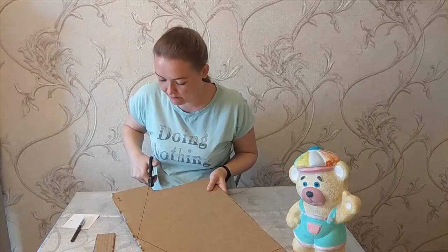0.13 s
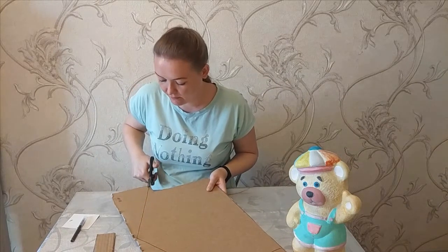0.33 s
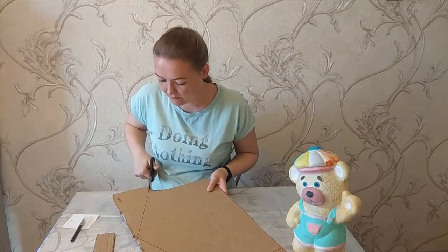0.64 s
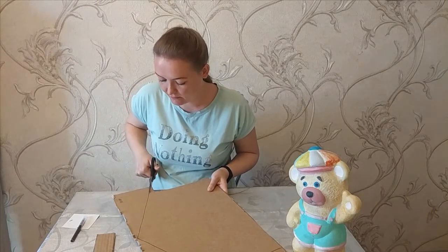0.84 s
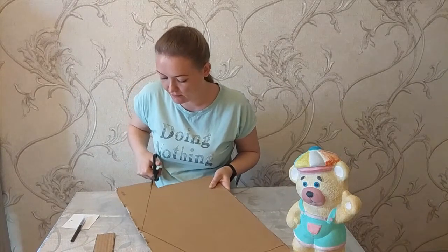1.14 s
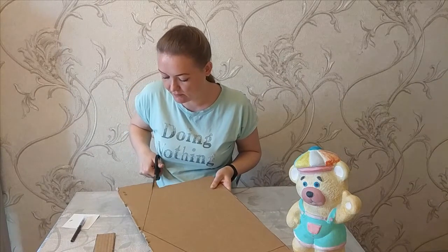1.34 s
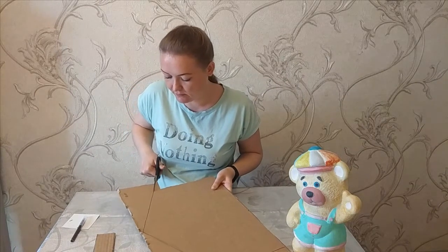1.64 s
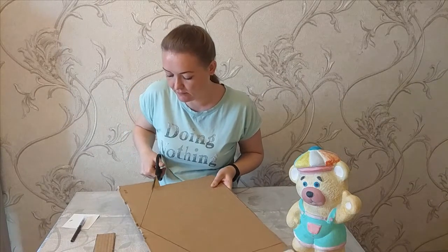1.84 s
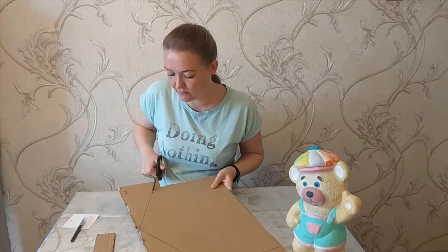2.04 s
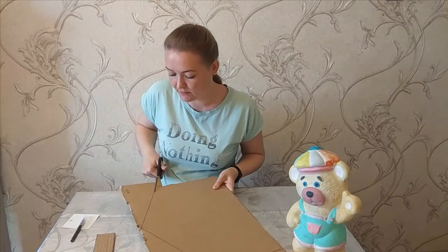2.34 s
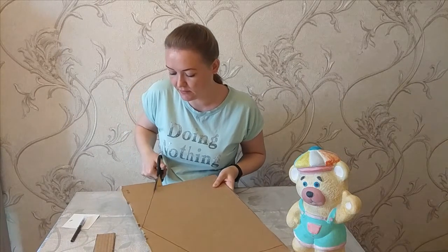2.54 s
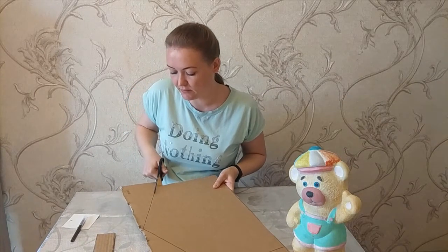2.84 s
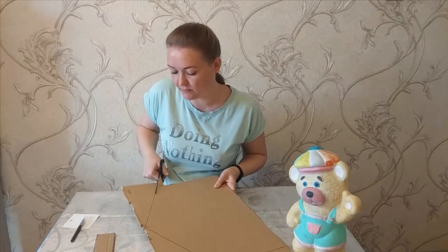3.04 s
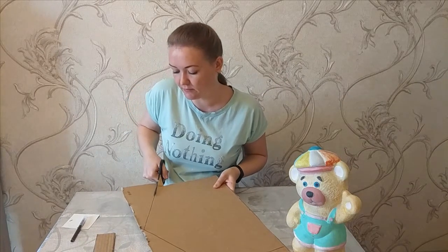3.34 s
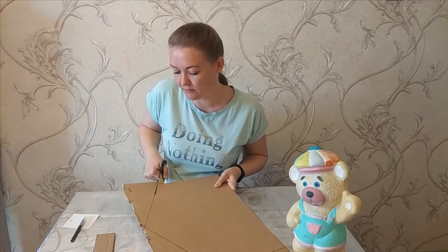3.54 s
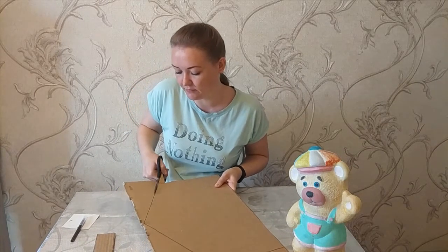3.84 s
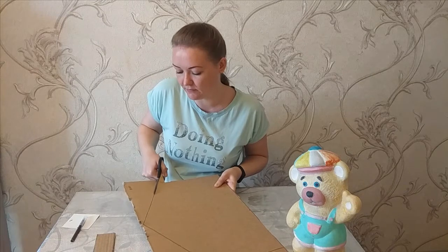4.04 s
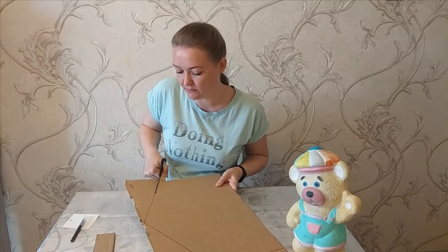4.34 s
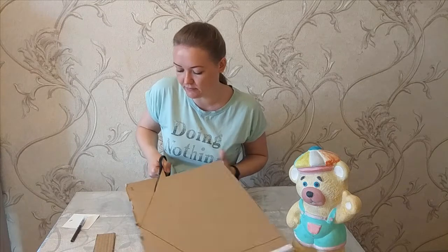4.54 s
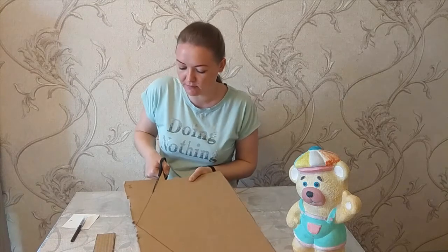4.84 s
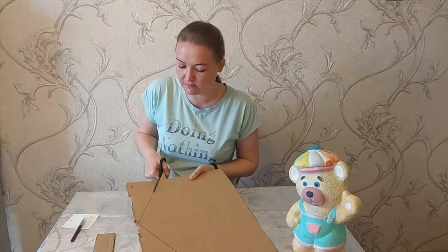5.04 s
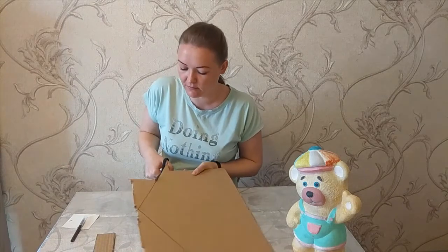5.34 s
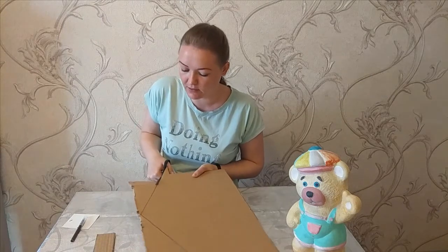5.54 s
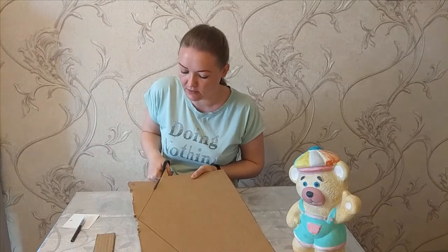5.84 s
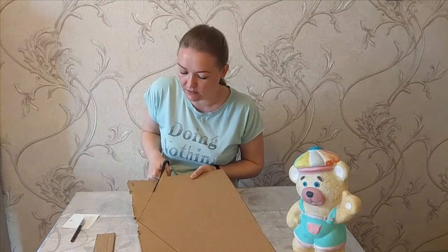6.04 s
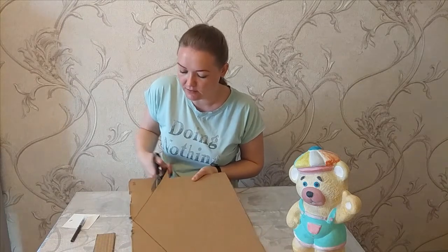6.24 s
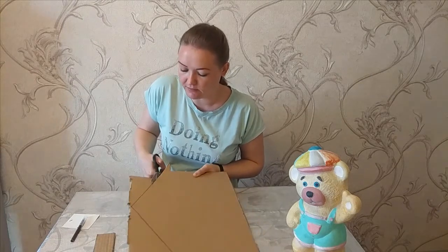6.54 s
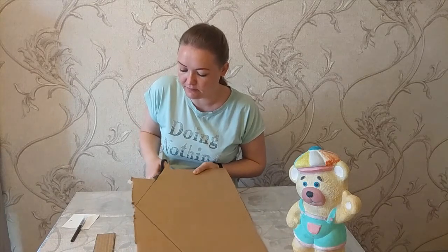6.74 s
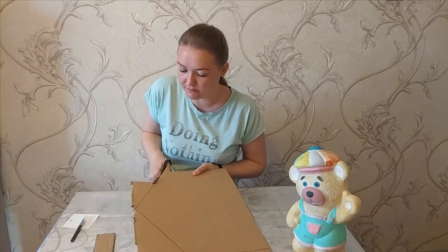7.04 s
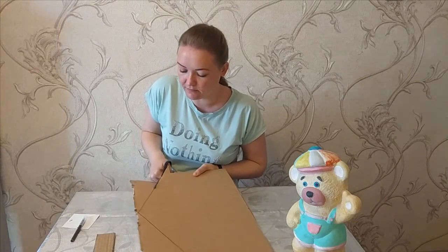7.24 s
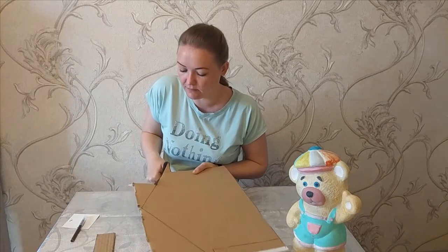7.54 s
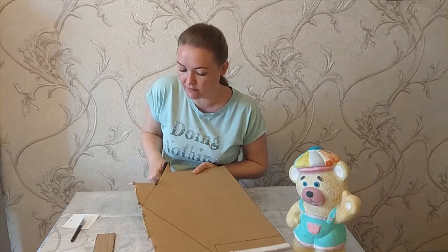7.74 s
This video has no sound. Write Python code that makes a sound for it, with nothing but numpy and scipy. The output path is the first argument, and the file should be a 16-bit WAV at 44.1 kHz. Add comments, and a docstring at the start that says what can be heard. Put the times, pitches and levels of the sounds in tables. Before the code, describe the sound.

In a small, quiet room, someone works scissors through a stiff cardboard sheet, heard from a couple of metres away. The cutting starts softly, then goes on as irregular crunches, crisp tearing and hollow cracks as the cardboard gives way. Between and under the cuts come light flaps of the sheet, a few dull bumps and a faint hum from the table. A low rumble lies underneath.

```python
"""A small room, a table two metres away: scissors bite through thick cardboard.
Each stroke tears fibres in dense crackles. Flutes give way in snaps that ring the hollow sheet.
The sheet flaps and nudges the table into a hum; now and then an arm bumps the table.
Low rumble and quiet air lie underneath."""
import sys
import numpy as np
from scipy import signal
from scipy.fft import rfft, irfft, next_fast_len
from scipy.io import wavfile
from scipy.ndimage import uniform_filter1d, map_coordinates

SR = 44100
rng = np.random.default_rng(int(sys.argv[2]) if len(sys.argv) > 2 else 0)


def to_wav(s):
    """Save 16-bit WAV."""
    ch = np.atleast_2d(s).T  # columns
    pcm = np.round(np.clip(ch, -1, 1) * 32767)  # PCM
    wavfile.write(sys.argv[1], SR, pcm.astype(np.int16))


N = 347508

# (full force at [s], rise [s], hold [s], tear [dB], ring, crunch, panel, flap [dB re tear])
BLADE_STROKES = [(-0.005, 0.078, 0.056, -60.5, -16, -22, -28, -15),
                 (0.324, 0.07, 0.23, -59, -13.5, -15.5, -20, -9),
                 (0.648, 0.18, .04, -52, -8.5, -14, -14, -11),
                 (0.736, 0.064, 0.072, -43, -17, -19, -24, -44),
                 (0.853, 0.022, 0.0082, -40.5, -14, -14, -27, -26),
                 (1.024, 0.12, 0.05, -44, -20, -11, -42, -27), (1.1, .05, 0.038, -58.5, -5, 1, -16, -9),
                 (1.341, 0.016, 0.018, -53, -28, -38, -43, -19),
                 (1.416, 0.038, 0.13, -42, -16, -29, -20, -25),
                 (1.542, 0.081, 0.0086, -37, -10.5, -28, -21, -44),
                 (1.767, 0.065, 0.066, -41.5, -22, -13.5, -31, -35),
                 (1.966, 0.088, 0.057, -55, -23, -32, -32, -23), (1.87, .03, 0.023, -56, -1, 1.5, -12, -11),
                 (2.098, 0.069, 0.033, -44.5, -23, -23, -34, -22),
                 (2.153, 0.051, 0.059, -43.5, -3, -9.5, -21, -15),
                 (2.259, 0.17, 0.0081, -36, -3.5, -13, -14.5, -27),
                 (2.481, 0.14, 0.056, -43, -13.5, -10.5, -27, -25),
                 (2.746, 0.15, 0.066, -58.5, -5.5, -8, -7, -16),
                 (2.892, 0.036, 0.0067, -30, -2, -14, -13.5, -27),
                 (3.132, 0.065, 0.052, -43.5, -15, -10, -18.5, -33.5),
                 (3.364, .15, 0.052, -56, -0.5, -2, -26.5, -5),
                 (3.498, 0.044, 0.024, -33.5, -4, -7.5, -23, -18),
                 (3.569, 0.023, 0.0033, -24.5, -15, -17, -30.5, -29),
                 (3.805, 0.15, 0.0085, -40.5, -13, -10.5, -24, -22.5),
                 (4.079, 0.11, .01, -50, 4, 2, -7, -3), (4.195, 0.05, 0.086, -40, -7, -13, -13, -12),
                 (4.445, 0.15, 0.069, -43.5, -11.5, -15.5, -19, -20.5),
                 (4.598, 0.077, 0.037, -53.5, -29, -32, -21, -20),
                 (4.698, 0.19, 0.039, -48.5, -36, -33, -39, -17),
                 (4.797, 0.079, 0.088, -52, -12, -12, -10.5, -11),
                 (5.036, 0.17, 0.026, -47, -13.5, -11, -18, -17),
                 (5.156, 0.18, 0.022, -48, -10.5, -15, -9, -18),
                 (5.384, .2, 0.018, -60.5, -30, -32, -6.5, -23),
                 (5.584, 0.042, 0.0046, -33.5, -24, -21.5, -17, -19.5),
                 (5.759, 0.035, 0.025, -69, 11.5, 4, 6, -10),
                 (5.841, 0.091, 0.072, -47.5, -27, -17, -9, -20),
                 (5.976, 0.11, 0.018, -38, -9.5, -15.5, -11, -12),
                 (6.251, 0.11, 0.042, -39.5, -8, -11.5, -14, -20),
                 (6.317, 0.047, 0.052, -61.5, -17, 5.5, -15, -6),
                 (6.485, 0.21, 0.018, -45.5, -15, -16, -14.5, -22),
                 (6.615, 0.13, 0.12, -56.5, -17, -16, -17, -13.5),
                 (6.75, 0.026, 0.023, -62.5, -1, 1, 6, 2.5), (6.808, 0.15, .04, -65, -5, 2, 5, 5.5),
                 (7.002, 0.4, 0.061, -54.5, -8.5, -19, -8.5, -15),
                 (7.175, 0.17, 0.011, -41.5, -25, -18, -9, -20),
                 (7.268, 0.03, 0.0078, -34.5, -9, -18, -12.5, -18),
                 (7.433, 0.042, 0.019, -54, -8, -3, 3, -22), (7.503, 0.23, 0.03, -44.5, -29, -27, -33, -33),
                 (7.721, 0.13, .02, -54.5, -11, -13, -13, -19),
                 (7.864, 0.11, .03, -40, -10.5, -9.5, -12.5, -13.5)]
# decay after a stroke: (tear, scrape, ring, crunch, panel, flap [dB/s])
LAYER_FALL_DB_PER_S = [205, 150, 151, 140, 151, 130]
# hands resting on the sheet: (tear, scrape, ring, crunch, panel, flap [dB])
LAYER_REST_DB = [-67, -76, -79.5, -111, -78, -76.5]
# flutes giving way: (time [s], level [dB], ring, crunch [dB re level], t60 [s], pitch [Hz])
FLUTE_SNAPS = [(0.45, -42, -6.5, -30, 0.46, 664), (0.586, -34, -14, -25, 0.26, 673),
               (0.637, -26, -11, -15.5, 0.28, 505), (0.737, -26, -8.5, -34, 0.23, 685),
               (0.791, -27.5, -11, -23, 0.2, 686), (0.845, -17, -18, -30, 0.092, 650),
               (0.964, -47.5, -15, 10.5, 0.26, 945), (1.099, -33.5, -22, -2, 0.33, 1050),
               (1.151, -48.5, 9, 7, 0.088, 1130), (1.421, -19, -20, -30, 0.2, 686),
               (1.524, -18, -7.5, -12, 0.17, 640), (1.735, -29, -46, -25, 0.19, 1720),
               (1.81, -26, -25, -2.5, 0.23, 1170), (2.09, -19, -21, -39, 0.24, 715),
               (2.153, -33.5, 10.5, 2, 0.18, 750), (2.234, -15, 0.5, -4, 0.29, 734),
               (2.457, -25.5, -29, -12, 0.16, 1470), (2.735, -44, -1, -8, 0.13, 664),
               (2.868, -11, -10, -12.5, 0.2, 750), (3.106, -37, -20, -22, 0.23, 690),
               (3.159, -30, -38, 1, 0.18, 1190), (3.38, -46, 12, -20, 0.2, 760),
               (3.411, -36, 3.5, -24, 0.13, 690), (3.483, -8, -15.5, -17, 0.066, 730),
               (3.509, -17.5, -1, -23, 0.18, 700), (3.565, -9.5, -8.5, -8.5, 0.18, 990),
               (4.03, -42.5, 9, -29, 0.17, 686), (4.066, -35, -15, -0.5, 0.24, 1530),
               (4.19, -30.5, 7, -28, 0.61, 646), (4.37, -36.5, -26, -0.5, 0.2, 1430),
               (4.429, -48, -20, -39, 0.22, 890), (4.749, -27, -17, -28, 0.24, 770),
               (4.819, -44.5, 5, -23, 0.31, 646), (5.149, -39, -10, -8, 0.24, 576),
               (5.233, -38, -0.5, -2, 0.29, 1000), (5.542, -57, 19, -21, 0.31, 617),
               (5.569, -25, -3, -6, 0.17, 577), (5.759, -43.5, 1, -9, 0.2, 616),
               (5.868, -20, -10.5, -13, 0.23, 620), (5.942, -19.5, -7, -25, 0.17, 606),
               (5.986, -36, -16, -22, 0.7, 390), (6.284, -28, 2.5, -25, 0.18, 736),
               (6.823, -30, -10, -9, 0.29, 514), (7.13, -25, -4, -8, 0.38, 610),
               (7.265, -13, -19, -12, 0.24, 654), (7.435, -39, 2, -2.5, 0.28, 460),
               (7.81, -29.5, -10.5, -14, 0.14, 830), (7.851, -17, -6, -18, 0.21, 455)]
# spectra of the cut: (frequency [Hz], density [dB])
TEAR_SPECTRUM = [(4120, -20.5), (7000, -18.5), (7820, -15), (8180, -10), (9300, -3.5), (10900, 2),
                 (12300, 2), (15100, -9), (16000, -12.5)]
SCRAPE_SPECTRUM = [(1650, -4.5), (2800, -3.5), (4040, -3), (6430, -3), (7570, -3), (8500, -8.5),
                   (11000, -67), (18700, -120)]
CRUNCH_SPECTRUM = [(800, -51), (1050, 5.5), (2000, 8.5), (3000, -49), (3800, -58)]
# sheet near the cut, its wide free panel, flute walls: (frequency [Hz], width [Hz], level [dB])
SHEET_MODES = [(651.8, 18, 1.5), (701.4, 31.4, 3), (757, 31, -1.5), (832, 35, -0.5), (868.7, 34, 1),
               (965, 33, 0), (1002, 59, 2)]
PANEL_MODES = [(403.3, 22, 1), (472, 18.5, 0.5), (511.4, 37, -1.5), (574.4, 12, -2.5)]
FLUTE_MODES = [(1162, 156, -6), (1360, 200, -6.5), (1547, 67, -8.5), (1693, 250, -3), (1980, 74, -3),
               (2370, 240, -0.5), (2560, 1070, 2.5)]
# arm against table: (time [s], level [dB])
ARM_BUMPS = [(0.334, -42), (1.461, -18), (3.217, -26), (7.366, -30.5)]
# table resonances: (frequency [Hz], level [dB], t60 [s])
TABLE_MODES = [(69.7, 1, 0.3), (119.6, -17, 0.38)]
# sheet against table: (time [s], hum level [dB])
SHEET_NUDGES = [(0.85, -66.5), (1.27, -61), (1.75, -61), (2.24, -58.5), (2.6, -58), (2.9, -51),
                (3.5, -46.5), (3.68, -49.5), (4.1, -53.5), (4.3, -60.5), (4.5, -62), (4.76, -56.5),
                (5.9, -58.5), (6.0, -55.5), (6.3, -67), (6.7, -64), (7.31, -53), (7.86, -61)]
# low rumble: (time [s], level [dB])
RUMBLE_LEVELS = [(0.0, -58.5), (0.48, -58.5), (0.79, -48.5), (1.29, -62), (1.6, -51), (1.82, -56),
                 (4.94, -57.5), (5.27, -57.5), (7.02, -62), (7.88, -51)]
# room air: (frequency [Hz], density [dB])
AIR_SPECTRUM = [(29, -16), (50, 12.5), (184, -2), (345, -8), (380, -12), (1580, -11.5), (4560, -11),
                (5020, -17.5), (7570, -54), (12000, -32), (16000, -27)]
# left-right likeness: (frequency [Hz], coherence [0-1])
STEREO_COHERENCE = [(60, 0.91), (300, 0.94), (640, 0.73), (1400, 0.17), (4000, 0.06), (7000, 0.067),
                    (9000, 1), (15000, 0.96)]
# left behind right: (frequency [Hz], lag [cycles])
LEFT_LAG = [(200, 0.0088), (950, 0.072), (1700, 0.058), (4000, 0.56), (7000, 0.71), (8500, 0.86),
            (16000, 1)]


def scissors(tear_gain, scrape_gain, ring_gain, crunch_gain, panel_gain):
    """Steady tearing and snaps drive the same fibres and the same sheet."""
    treble_snap, ring_snap, crunch_snap = snap_gains()
    fibres = crackle(rate_hz=2500, spread_db=2.0, clump_db=3.0, wet=2.5, t60_s=0.53)
    flutes = crackle(rate_hz=450, spread_db=1.0, clump_db=2.5, wet=2.07, t60_s=0.2)
    out = np.hypot(tear_gain, treble_snap) * coloured(fibres, TEAR_SPECTRUM)
    out += np.hypot(scrape_gain, amp(-14) * treble_snap) * coloured(fibres, SCRAPE_SPECTRUM)
    walls = cardboard_ring(flutes, FLUTE_MODES, drift_db=2.5, drift_hz=9)
    crunch = unit(walls + 0.76 * coloured(flutes, CRUNCH_SPECTRUM))
    out += np.hypot(crunch_gain, crunch_snap) * crunch
    sheet = cardboard_ring(flutes, SHEET_MODES, drift_db=4.0, drift_hz=3.013)
    out += np.hypot(ring_gain, ring_snap) * sheet
    return out + panel_gain * cardboard_ring(flutes, PANEL_MODES, drift_db=3.0, drift_hz=4)


def stroke_gains(climb_db=34.5):
    """Gain per layer: each stroke rises, holds and dies; powers add."""
    at_s, rise_s, hold_s, tear_db, *offsets_db = np.transpose(BLADE_STROKES)[:, :, None]
    t = np.arange(0, N, 32) / SR
    scrape_db = -12.5 + 0.13 * (tear_db + 40)  # more force, more scrape
    peak_db = tear_db + np.array([np.zeros_like(at_s), scrape_db, *offsets_db])
    rise_db = climb_db * np.maximum(at_s - t, 0) / rise_s
    fall_db = np.reshape(LAYER_FALL_DB_PER_S, (-1, 1, 1)) * np.maximum(t - at_s - hold_s, 0)
    power = np.sum(amp(peak_db - fall_db - rise_db) ** 2, axis=1)
    return [np.interp(np.arange(N) / SR, t, np.sqrt(layer + amp(rest_db) ** 2))
            for layer, rest_db in zip(power, LAYER_REST_DB)]


def crackle(rate_hz, spread_db, clump_db, wet, t60_s):
    """Tiny uneven breaks in clumps; near walls answer each with a dying hiss."""
    size = amp(spread_db * np.minimum(rng.exponential(size=N), 3) + clump_db * wobble(70))
    breaks = size * rng.standard_normal(N) * (rng.random(N) < rate_hz / SR)
    local_power = np.abs(uniform_filter1d(breaks ** 2, size=SR // 16))
    breaks /= np.sqrt(local_power + 0.009 * np.mean(breaks ** 2))
    tail = amp(-60 * np.arange(SR // 4) / SR / t60_s) ** 2
    echo = np.sqrt(np.abs(signal.fftconvolve(breaks ** 2, tail / tail.sum())[:N]))
    return wet * echo * rng.standard_normal((2, N)) + [breaks, np.zeros(N)]


def snap_gains(trim_db=-18):
    """A flute gives way: a crack, then room decay. Rows: treble, ring, crunch."""
    gains, t = np.zeros((3, N + SR)), np.arange(SR // 2) / SR
    crack_t60_s = np.array([[.008], [.05], [.03]])
    crack = np.array([[.7], [.8], [1.8]]) * amp(-60 * t / crack_t60_s)
    for at_s, db, ring_db, crunch_db, t60_s, _ in FLUTE_SNAPS:
        shape = amp(-60 * t / t60_s) * (1 - np.exp(-t / 0.00066)) * (1 + crack)
        add_at(gains, at_s, amp(db + trim_db) * amp([[0], [ring_db], [crunch_db]]) * shape)
    return gains[:, :N]


def cardboard_ring(drive, modes, drift_db, drift_hz, falloff_db_per_oct=11.5):
    """Modes trade strength as grip and cut move; those near the snap pitch lead."""
    pitch_oct = timeline([(at_s, np.log2(hz)) for at_s, *_, hz in FLUTE_SNAPS])
    shares = []
    for hz, _, db in modes:
        distance_oct = np.abs(np.log2(hz) - pitch_oct)
        shares.append(amp(db + drift_db * wobble(drift_hz) - falloff_db_per_oct * distance_oct))
    shares = np.array(shares) / np.linalg.norm(shares, axis=0)
    return unit(sum(share * resonance(drive, hz, width_hz)
                    for share, (hz, width_hz, _) in zip(shares, modes)))


def sheet_knocks(trim_db=-13.5, falloff_db_per_oct=25.4):
    """Each snap strikes the sheet; modes near its pitch ring freely."""
    out, t = np.zeros(N + SR), np.arange(SR // 4) / SR
    hz, width_hz, mode_db = np.transpose(PANEL_MODES + SHEET_MODES + FLUTE_MODES)[:, :, None]
    attack = 1 - np.exp(-t / 0.0021)
    for at_s, db, ring_db, crunch_db, _, pitch_hz in FLUTE_SNAPS:
        size, phase = rng.standard_normal((2, len(hz), 1))
        gain = amp(mode_db + 0.87 * size - falloff_db_per_oct * np.abs(np.log2(hz / pitch_hz)))
        modes = gain * np.exp(-2.4 * width_hz * t) * np.sin(2 * np.pi * hz * t + 3 * phase)
        add_at(out, at_s, amp(db + max(ring_db, crunch_db) + trim_db) * attack * modes.sum(axis=0))
    return out[:N]


def sheet_flap(noise):
    """The sheet flaps: low, fluttering noise."""
    spectrum_hz_db = [(130, -76.5), (180, -10.0), (280, 5), (370, -4.5), (450, -18)]
    return amp(1.6 * wobble(23)) * coloured(noise, spectrum_hz_db)


def table_bumps():
    """An arm gives one soft push; the table's low modes build and die."""
    out, t = np.zeros(N + SR), np.arange(SR // 2) / SR
    push = 0.6 * np.cos(2 * np.pi * 110 * (t - .008)) * np.exp(-((t - .010) / 0.0068) ** 2)
    ring = sum(amp(db - 60 * t / t60_s) * np.sin(2 * np.pi * hz * t + 0.27)
               for hz, db, t60_s in TABLE_MODES)
    build = 1 - np.exp(-(t / 0.058) ** 2)
    for at_s, db in ARM_BUMPS:
        add_at(out, at_s, amp(db) * (push + 2.96 * ring * build))
    return out[:N]


def table_hum(noise, rise_db_per_s=245, fall_db_per_s=93, rest_db=-76.5):
    """Nudges from the sheet set the table's upper mode humming."""
    t = np.arange(N) / SR
    nudges_db = [db - np.maximum(fall_db_per_s * (t - at_s), rise_db_per_s * (at_s - t))
                 for at_s, db in SHEET_NUDGES]
    level_db = np.maximum(np.max(nudges_db, axis=0), rest_db)
    return amp(level_db) * resonance(noise, hz=121.4, width_hz=4.2)


def room_tone(rumble_noise, air_noise):
    """Wavering low rumble and steady, quiet air."""
    spectrum_hz_db = [(3, -29), (10, 11.5), (22, 4.0), (40, 0), (75, -13), (100, -68)]
    rumble_db = timeline(RUMBLE_LEVELS) + 4.3 * wobble(3.3)
    rumble = amp(rumble_db) * coloured(rumble_noise, spectrum_hz_db)
    return rumble + amp(-67.5) * coloured(air_noise, AIR_SPECTRUM)


def stereo(pair, balance_db=0.6):
    """(common, differing) parts to (left, right); left lags and is slightly louder."""
    def weights(hz):
        angle = np.arccos(np.clip(along(STEREO_COHERENCE, hz), -1, 1)) / 2
        return np.array([np.cos(angle), np.sin(angle)])
    mid, side = filtered(pair, weights)
    left = filtered(mid + side, lambda hz: np.exp(-2j * np.pi * along(LEFT_LAG, hz)))
    return np.array([amp(balance_db) * left, amp(-balance_db) * (mid - side)])


def amp(db):
    """dB to gain."""
    return 10 ** (np.asarray(db) / 20)


def unit(x):
    """Scale to rms 1."""
    return x / np.sqrt(np.mean(x ** 2) + 1e-20)


def add_at(out, at_s, event):
    """Mix in place."""
    out[..., round(at_s * SR):][..., :event.shape[-1]] += event


def along(points, hz):
    """Interpolate (frequency [Hz], value) on a log axis."""
    knots_hz, values = np.transpose(points)
    return np.interp(np.log(hz + 1), np.log(knots_hz + 1), values)


def timeline(points):
    """Interpolate (time [s], value) per sample."""
    return np.interp(np.arange(N) / SR, *np.transpose(points))


def wobble(rate_hz):
    """Smooth random curve."""
    t = np.arange(0, N, 32) / SR
    knots = rng.standard_normal(int(N * rate_hz / SR) + 4)
    return np.interp(np.arange(N) / SR, t, map_coordinates(knots, [t * rate_hz]))


def filtered(x, response):
    """Apply a complex frequency response."""
    size = next_fast_len(N + SR // 2)
    return irfft(rfft(x, size) * response(np.fft.rfftfreq(size, 1 / SR)), size)[..., :N]


def coloured(x, spectrum):
    """Shape by (frequency [Hz], level [dB]); rms 1."""
    return unit(filtered(x, lambda hz: amp(along(spectrum, hz))))


def resonance(x, hz, width_hz):
    """Steep-sided band-pass; rms 1."""
    def response(f):
        damping = 1.5j * f * width_hz
        return (damping / (hz * hz - f * f + damping)) ** 2
    return unit(filtered(x, response))


def scene():
    """Sum the sources as (common, differing) parts, then spread to stereo."""
    *cut_gains, flap_gain = stroke_gains()
    pair = scissors(*cut_gains)
    rumble_noise, hum_noise, flap_noise, air_noise = rng.standard_normal((4, 2, N))
    pair += room_tone(rumble_noise, air_noise) + table_hum(hum_noise)
    pair += flap_gain * sheet_flap(flap_noise)
    pair[0] += sheet_knocks() + table_bumps()
    pair[1] += 0.22 * sheet_knocks()  # a second random mix of the same modes widens the knocks
    return stereo(pair)


def record(dry, top_hz=15900):
    """Brick-wall low-pass."""
    return filtered(dry, lambda hz: hz < top_hz)


dry = scene()
out = record(dry)
to_wav(out)
```